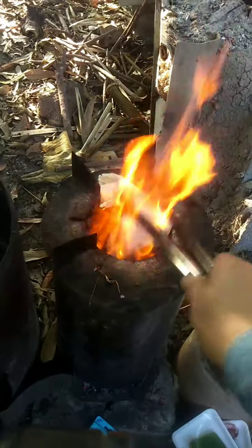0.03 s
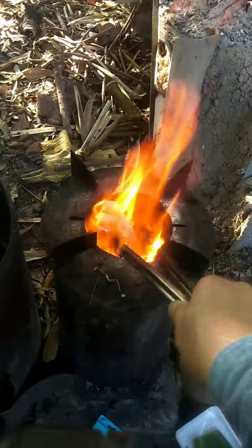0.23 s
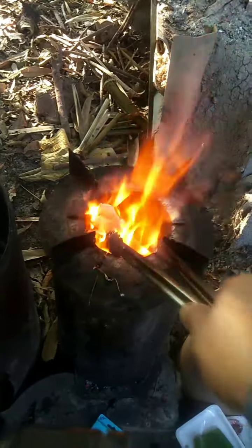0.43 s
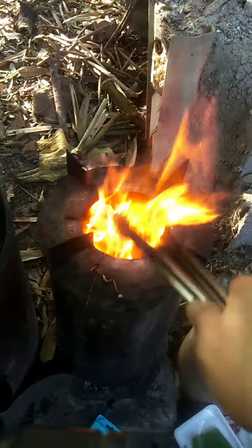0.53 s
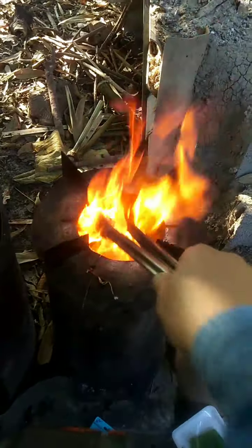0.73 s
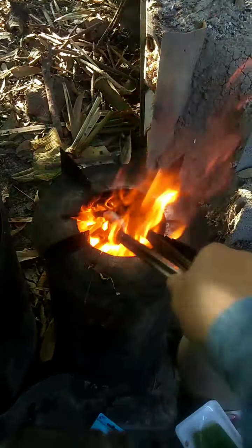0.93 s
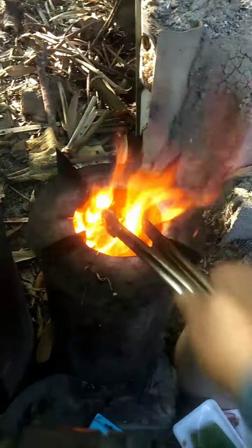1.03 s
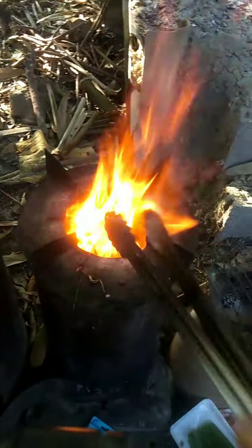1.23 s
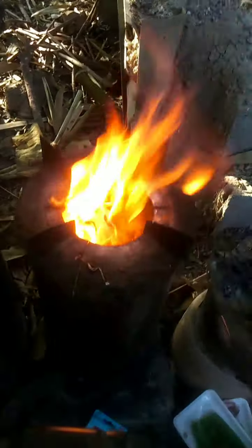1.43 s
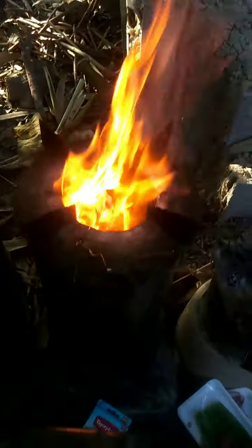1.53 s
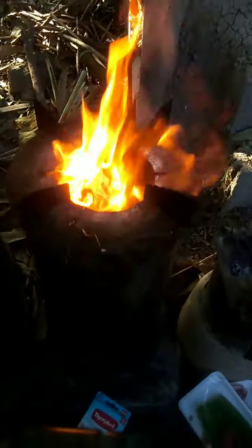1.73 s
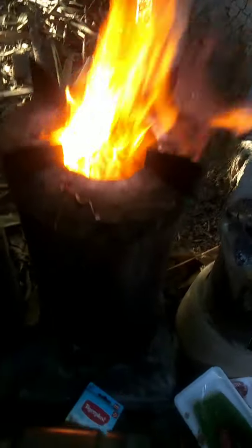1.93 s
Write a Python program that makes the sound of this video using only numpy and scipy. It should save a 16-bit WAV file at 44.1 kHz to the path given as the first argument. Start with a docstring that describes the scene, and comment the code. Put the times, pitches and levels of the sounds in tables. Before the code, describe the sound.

Close up and outdoors, metal tongs strike a small stove twice with a brief ring, scraping through embers in between. A quiet fire flutters underneath, followed by a few sharp wood snaps and a faint sizzle.

```python
"""Metal tongs push fuel into a small burning stove outdoors, close by.
They knock twice against the stove, each knock a cluster of contacts that briefly rings the
modes of both, and they scrape and clink through the embers. The flames flutter and hiss
throughout as shaped noise, and the burning sticks snap now and then with a pop and a spit
of steam. A faint whistle wavers at the start; sap sizzles toward the end."""
import sys
import numpy as np
from scipy import signal
from scipy.fft import rfft, irfft
from scipy.io import wavfile
from scipy.ndimage import uniform_filter1d

SR = 44100
rng = np.random.default_rng(int(sys.argv[2]) if len(sys.argv) > 2 else 0)


def bounce(signal):
    """Save signal as a 16-bit WAV file at the path given by the first command-line argument."""
    frames = np.transpose(np.atleast_2d(signal))
    limited = np.clip(frames, -1, 1)
    pcm = np.round(limited * 32767).astype(np.int16)
    wavfile.write(sys.argv[1], SR, pcm)


N = 88200

# start_s, stove_ring_db, stove_clank_db, tongs_clink_db, focus_hz
CONTACTS = [(.1852, -38, -20, -8, 4050), (.2196, -2.5, 2, 2.5, 4630), (0.2296, -7, 0, -1, 5400),
            (0.24, -7.5, -21, -3, 3280), (0.4445, -42, -12.5, -4, 3980), (0.449, -33.5, -21, -3, 3800),
            (0.4771, -31, -43, -11, 5500), (0.5136, -44, -37, -23, 4900), (0.884, -12.5, -54, -8.5, 3950),
            (0.8929, -12, -11, 2, 4300), (0.8984, -17, -12.5, -5, 4140)]
# pitch_hz, left_db, right_db, t60_s, right_lead_rad
STOVE_MODES = [(204, -24.5, -25.5, 0.11, 0), (311, -38.5, -42.5, 0.13, 0), (478.3, -26.5, -19.5, 0.2, 0.68),
               (562, -29, -32, 0.17, 1.7), (648, -35, -40, 0.32, 1), (780, -31.5, -36, 0.19, -0.45),
               (890, -39, -42.5, 0.22, -2), (947, -23, -32, 0.25, -2), (1083, -28.5, -39, 0.19, 0.4),
               (1192, -27, -40, 0.14, 2), (1368, -32, -40, 0.08, 3), (1403, -19, -24.5, 0.15, 2.8),
               (1491.4, -28, -15, 0.096, 2), (1635, -31, -35, 0.32, 0.6)]
# pitch_hz, left_db, right_db, t60_s
TONGS_MODES = [(1824, -40, -45, .22), (2260, -46, -45, .08), (2660, -47, -43, .15), (2998, -47, -45, .16),
               (3415, -54, -46, .19), (3560, -54, -49, .18), (3740, -48, -42, .06), (3855, -54, -48, .18),
               (4074, -50, -45, .18), (4225, -52, -46, .14), (4503, -52, -50, .1), (4826, -52, -48, .15),
               (5215, -58, -54, .2), (6600, -57, -57, .13)]
# dense partials: freq_hz, t60_s
PARTIAL_DECAY = [(150, 0.6), (1000, 0.17), (2000, 0.17), (4500, 0.14), (8000, 0.09), (15000, 0.14)]
# tongs through embers: start_s, length_s, level_db
STROKES = [(0.202, 0.039, -30.5), (0.346, 0.12, -43), (.448, 0.1, -45.5), (0.47, 0.024, -38.5),
           (0.868, 0.038, -37.5)]
# start_s, pop_db, pitch_hz, spit_db, pop_left_minus_right_db
WOOD_SNAPS = [(0.129, -45, 2440, -51.5, -5), (0.738, -54, 4530, -64, -9), (1.076, -48.5, 5370, -63, 9),
              (1.2758, -37, 3460, -59.5, -12.5), (1.4256, -28, 4740, -34.5, -3),
              (1.616, -36.5, 4170, -41.5, -11), (1.7087, -32, 4020, -63, -6),
              (1.8858, -45.5, 3750, -51.5, -8)]
# time_s, pitch_hz, level_db
WHISTLE_PATH = [(0, 784, -63), (0.046, 696, -62.5), (0.078, 745, -65), (0.139, 752, -65),
                (0.201, 777.5, -49.5), (.24, 780, -70)]
# freq_hz, left_right_correlation
STEREO_COHERENCE = [(60, 0.97), (200, 0.98), (380, 0.65), (700, 0.86), (1300, -0.25), (2400, -0.38),
                    (4400, -0.22), (15000, 0.039)]

# noise spectra: freq_hz, relative_density_db
CLANK_SPECTRUM = [(40, -31), (120, -3.5), (400, -28), (700, 0), (1000, 1.5), (1500, 10), (1900, 0.5),
                  (2600, -16), (6000, -19.5)]
CLINK_SPECTRUM = [(200, -37), (1800, -4), (2700, 0.5), (4200, 4.5), (5500, 2), (6700, -10.5), (8500, -12.5),
                  (11000, -12), (15500, -8)]
GRIT_SPECTRUM = [(300, 0), (550, -51), (780, -14), (1100, -20), (1450, 7.5), (2000, -12), (2280, -14),
                 (2900, 1), (5200, 3), (7000, -7), (9000, -12.5), (12000, -8.5), (15500, -0.5)]
SPIT_SPECTRUM = [(1000, -49), (3000, 4), (5000, 7.5), (8000, -5.5), (11000, 6), (13500, 6), (15000, -2)]
RUMBLE_SPECTRUM = [(20, -46), (40, -30), (60, -10.5), (80, -1.5), (110, 3), (150, -5.5), (195, 4),
                   (240, -15.5), (320, -15.5), (700, -45)]
FLAP_SPECTRUM = [(150, -46.5), (240, -4), (300, 5.5), (345, -3), (385, 2), (450, -13.5), (560, -18.5),
                 (1000, -47.5)]
ROAR_SPECTRUM = [(100, -33), (400, 1), (560, -3), (800, 3), (1200, 7.5), (1700, -0.5), (2200, -0.5),
                 (2800, -8), (4200, -11.5), (5500, -18.5), (7500, -31), (15000, -55)]
HISS_SPECTRUM = [(2000, -39), (5000, -1), (8000, -16), (11000, -8), (15500, 1)]
SIZZLE_SPECTRUM = [(1000, -18), (2100, -5.5), (2700, -3), (3400, -3.5), (4100, 1), (4800, -33), (8000, -32)]

# spectra around a pitch: pitch_ratio, relative_density_db
TICK_SHAPE = [(.3, -15), (.65, -14.5), (.85, -5.5), (1, 5), (1.2, -13), (1.7, -23), (3, -31)]
POP_ECHO_SHAPE = [(.2, -8), (.55, -29), (.8, -15), (1, -7), (1.35, -5), (1.9, -21), (3.5, -49)]

# fire envelopes: time_s, gain_db
FLUTTER_GAIN = [(0, -61.5), (.1, -56), (.18, -71), (.28, -46), (.36, -45), (.48, -56.5), (.62, -55.5),
                (.69, -49), (.85, -60), (.95, -40.5), (.995, -50.5), (1.035, -46), (1.075, -62),
                (1.145, -44), (1.28, -56.5), (1.35, -46.5), (1.41, -53.5), (1.45, -51.5), (1.51, -48),
                (1.54, -63), (1.59, -42.5), (1.65, -66.5), (1.72, -44.5), (1.78, -54), (1.83, -46.5),
                (1.9, -41), (1.94, -55.5), (2, -54.5)]
ROAR_GAIN = [(0, -63), (.2, -52.5), (.4, -47.5), (.6, -55), (1.2, -55), (1.42, -51), (1.6, -52),
             (1.8, -51.5), (2, -56)]
HISS_GAIN = [(0, -0.5), (.6, -3), (1, 3.5), (1.17, -11), (1.33, -1), (1.5, -0.5), (1.75, -0.5), (1.9, 1),
             (2, 2.5)]
SIZZLE_GAIN = [(0, -72.5), (1.3, -90), (1.5, -61.5), (1.7, -61), (1.91, -71), (1.945, -58.5), (2, -54)]

CLINK_PAN_DB = -3


def knocks():
    """Each contact rings stove and tongs in its own proportion."""
    out, t = np.zeros((2, N)), np.arange(SR // 2) / SR
    rise_s = 0.00061
    stove = (1 - np.exp(-t / rise_s)) * stove_ring(t)
    damping = fade(t, t60_s=1)  # grip and embers damp the tongs
    for start_s, ring_db, clank_db, clink_db, focus_hz in CONTACTS:
        clink = tongs_ring(focus_hz, t) + amp(-34.5) * pan(CLINK_PAN_DB) * dense_ring(CLINK_SPECTRUM)
        clank = amp(-25) * pan(2) * dense_ring(CLANK_SPECTRUM)
        add(out, start_s, amp(ring_db) * stove + amp(clank_db) * clank + amp(clink_db) * damping * clink)
    return highpass(out, cutoff_hz=133)


def tongs_ring(focus_hz, t):
    """A short tick and decaying modes; the contact point favours those near focus_hz."""
    boost_db, width_oct = 5.5, 0.11
    tick = noise([(focus_hz * ratio, db) for ratio, db in TICK_SHAPE], len(t))
    ring = amp(-27) * pan(CLINK_PAN_DB) * fade(t, t60_s=0.041) * tick
    for hz, left_db, right_db, t60_s in TONGS_MODES:
        favour_db = boost_db * np.exp(-(np.log2(hz / focus_hz) / width_oct) ** 2)
        tone = np.sin(2 * np.pi * (hz * t + rng.random((2, 1))))
        ring += amp(favour_db) * amp([[left_db], [right_db]]) * fade(t, t60_s) * tone
    return ring


def stove_ring(t):
    """Decaying stove modes, each with its own level and phase per channel."""
    ring = np.zeros((2, len(t)))
    for hz, left_db, right_db, t60_s, lead_rad in STOVE_MODES:
        tone = np.sin(2 * np.pi * hz * t + np.array([[0], [lead_rad]]))
        ring += amp([[left_db], [right_db]]) * fade(t, t60_s) * tone
    return ring


def dense_ring(spectrum):
    """Many close partials of struck metal; the low ones last longest."""
    hz, t, bands = signal.stft(noise(spectrum, SR // 2), SR, nperseg=256)
    t60_s = at_freq(PARTIAL_DECAY, hz)[:, None]
    return signal.istft(bands * fade(t, t60_s), SR)[1][:, :SR // 2]


def scrapes():
    """Charred fuel crumbles along the tongs; the rubbing keeps stove and tongs ringing."""
    envelope, t = np.zeros((1, N)), np.arange(SR // 4) / SR
    for start_s, length_s, db in STROKES:
        add(envelope, start_s, amp(db) * signal.windows.tukey(round(length_s * SR), 0.9)[None])
    cracks = grains(rate_per_s=6100, spread_db=-3.5)
    rub = highpass(cracks[:1], cutoff_hz=1200)
    stove = unit_rms(signal.fftconvolve(rub, stove_ring(t))[:, :N])
    tongs = unit_rms(signal.fftconvolve(rub, tongs_ring(focus_hz=2170, t=t))[:, :N])
    grit = pan(-3) * colour(cracks, GRIT_SPECTRUM)
    return envelope * (grit + amp(-7) * stove + amp(-7.5) * tongs)


def snaps():
    """A pocket in the wood spits steam and bursts with a pitched pop that echoes in the stove."""
    out, t = np.zeros((2, N)), np.arange(SR // 10) / SR
    rise_s, fall_s, lead_s = 0.006, 0.007, t.mean()
    spit_envelope = np.exp(np.minimum((t - lead_s) / rise_s, (lead_s - t) / fall_s))
    for start_s, pop_db, hz, spit_db, pan_db in WOOD_SNAPS:
        echo = noise([(hz * ratio, db) for ratio, db in POP_ECHO_SHAPE], len(t)) * fade(t, t60_s=0.035)
        pop = fade(t, t60_s=0.006) * np.sin(2 * np.pi * hz * t)
        add(out, start_s, amp(pop_db) * pan(pan_db) * (pop + amp(-11) * echo))
        spit = spit_envelope * noise(SPIT_SPECTRUM, len(t))
        add(out, start_s - lead_s, amp(spit_db) * spit)  # peaks on the pop
    return out


def flames():
    """Low puffs of flame, higher flapping, a soft roar of draught, hiss and fine fizz."""
    flutter, rumble = envelope_gain(FLUTTER_GAIN), noise(RUMBLE_SPECTRUM, N)
    running_rms = np.sqrt(uniform_filter1d((rumble ** 2).mean(0), size=1300))
    puffs = flutter * rumble / running_rms
    flap = eddies(noise(FLAP_SPECTRUM, N), spread_db=7.5)
    flap = amp(-52) * unit_rms(flutter ** 0.68 * flap)  # follows the flutter loosely
    roar = envelope_gain(ROAR_GAIN) * pan(2) * eddies(noise(ROAR_SPECTRUM, N), spread_db=5)
    fizz = amp(-72.5) * colour(grains(rate_per_s=150, spread_db=5), GRIT_SPECTRUM)
    hiss = amp(-60.5) * envelope_gain(HISS_GAIN) * noise(HISS_SPECTRUM, N)
    return puffs + flap + roar + hiss + fizz


def eddies(x, spread_db, width_hz=110, length_s=0.04):
    """Eddies swell and fade in separate narrow bands."""
    frame, hop = 1024, 256
    bands = signal.stft(x, SR, nperseg=frame, noverlap=frame - hop)[2]
    swell = rng.standard_normal(bands.shape[1:])
    for _ in range(2):
        swell = uniform_filter1d(swell, round(width_hz * frame / SR), axis=0)
        swell = uniform_filter1d(swell, round(length_s * SR / hop), axis=1)
    bands *= amp(spread_db * unit_rms(swell))
    return unit_rms(signal.istft(bands, SR, nperseg=frame, noverlap=frame - hop)[1][:, :N])


def sizzle():
    """Sap sizzles as the stirred fuel catches."""
    return envelope_gain(SIZZLE_GAIN) * colour(grains(rate_per_s=3000, spread_db=1.1), SIZZLE_SPECTRUM)


def whistle(fuzz_hz=51):
    """A faint, fuzzy tone that dips and rises again."""
    t = np.arange(N) / SR
    time_s, pitch_hz, level_db = np.transpose(WHISTLE_PATH)
    carrier = np.exp(2j * np.pi * np.cumsum(np.interp(t, time_s, pitch_hz)) / SR)
    slow_noise = signal.sosfilt(signal.butter(2, fuzz_hz, fs=SR, output="sos"), rng.standard_normal((2, N)))
    fuzz = unit_rms(slow_noise[0]) + 1j * unit_rms(slow_noise[1])
    envelope = (t < time_s[-1]) * envelope_gain(np.c_[time_s, level_db])
    return envelope * (carrier * (1 + fuzz)).real


def grains(rate_per_s, spread_db, decay_s=0.0005):
    """Random tiny cracks of uneven strength, each a burst of noise."""
    onsets = rng.random(N) < rate_per_s / SR
    strength = amp(spread_db * np.minimum(rng.exponential(1, N), 4))
    envelope = signal.lfilter([1], [1, -np.exp(-1 / (decay_s * SR))], onsets * strength)
    return envelope * rng.standard_normal((2, N))


def colour(x, spectrum):
    """Impose a spectrum and the stereo coherence on two channels; rms 1."""
    (left, other), hz = rfft(x), np.fft.rfftfreq(x.shape[1], 1 / SR)
    coherence = at_freq(STEREO_COHERENCE, hz)
    right = coherence * left + np.sqrt(1 - coherence ** 2) * other
    return unit_rms(irfft(np.array([left, right]) * amp(at_freq(spectrum, hz)), x.shape[1]))


def noise(spectrum, size):
    return colour(rng.standard_normal((2, size)), spectrum)


def highpass(x, cutoff_hz):
    return signal.sosfilt(signal.butter(2, cutoff_hz, "highpass", fs=SR, output="sos"), x)


def amp(db):
    return 10 ** (np.asarray(db) / 20)


def unit_rms(x):
    return x / np.sqrt(np.mean(x ** 2) + 1e-20)


def at_freq(points, hz):
    knots_hz, values = np.transpose(points)
    return np.interp(np.log(hz + 1), np.log(knots_hz), values)


def envelope_gain(points):
    return amp(np.interp(np.arange(N) / SR, *np.transpose(points)))


def pan(left_minus_right_db):
    return amp([[left_minus_right_db / 2], [-left_minus_right_db / 2]])


def fade(t, t60_s):
    return np.exp(-np.log(1000) * t / t60_s)


def add(mix, start_s, sound):
    part = mix[:, max(round(start_s * SR), 0):][:, :sound.shape[1]]
    part += sound[:, :part.shape[1]]


def scene():
    fire = flames() + sizzle() + whistle()
    return fire + knocks() + scrapes() + snaps()


def record(dry):
    """Steep low-pass band limit."""
    cutoff_hz = 15850
    taps = signal.firwin(511, cutoff_hz, window=("kaiser", 9), fs=SR)
    return signal.oaconvolve(dry, taps[None], "same")


dry = scene()
out = record(dry)
bounce(out)
```